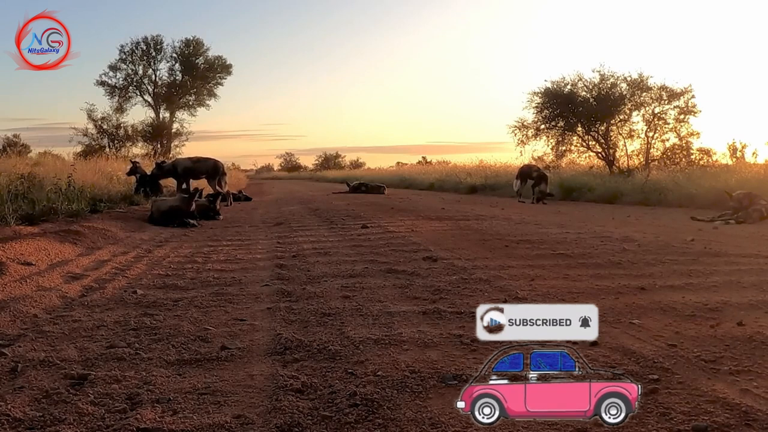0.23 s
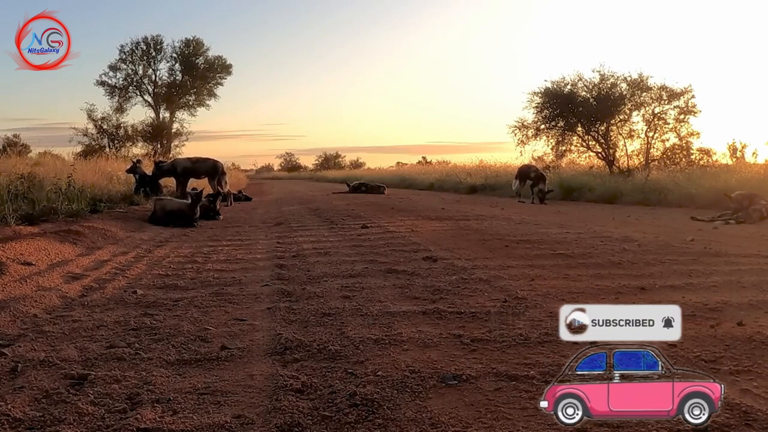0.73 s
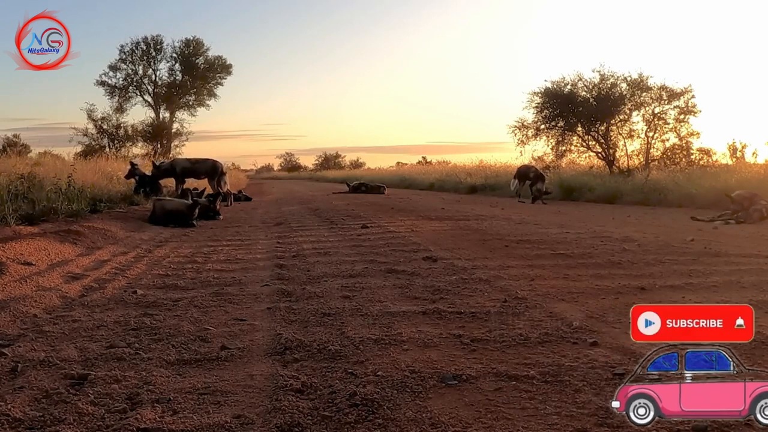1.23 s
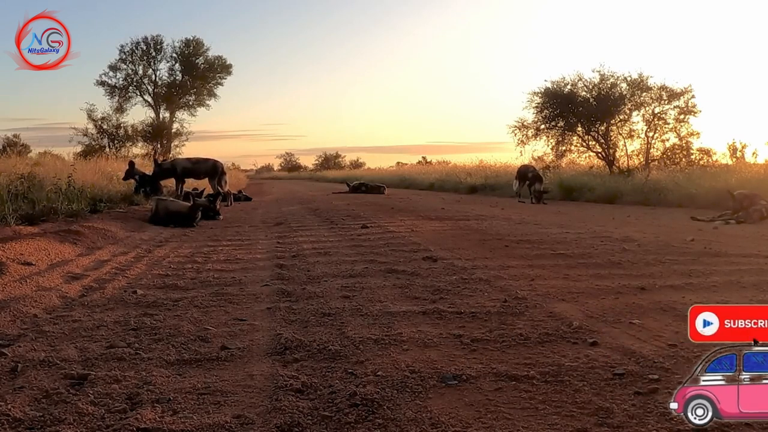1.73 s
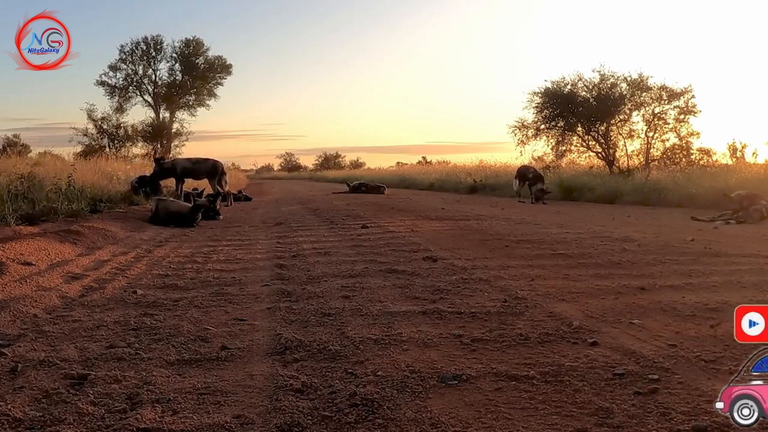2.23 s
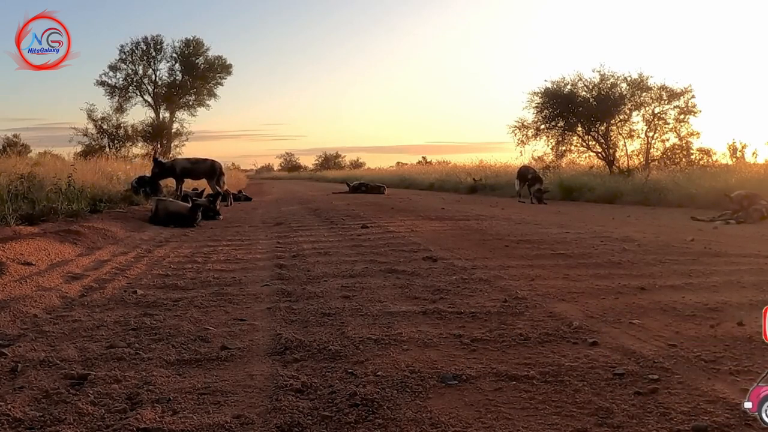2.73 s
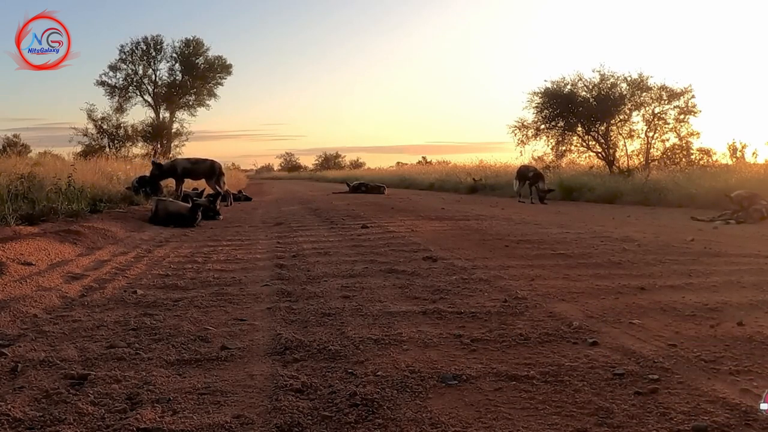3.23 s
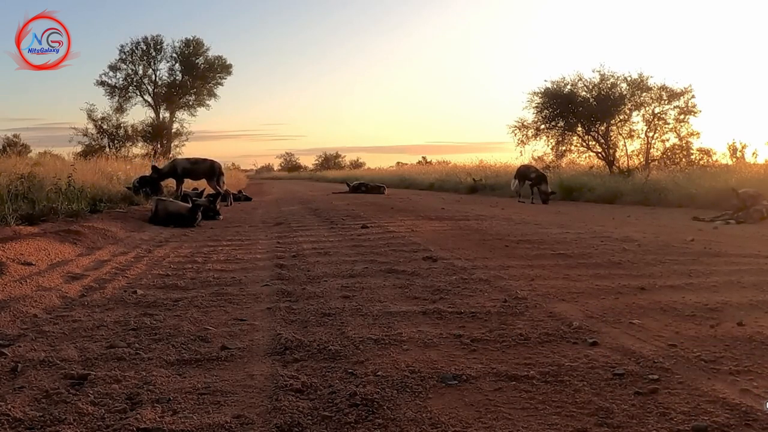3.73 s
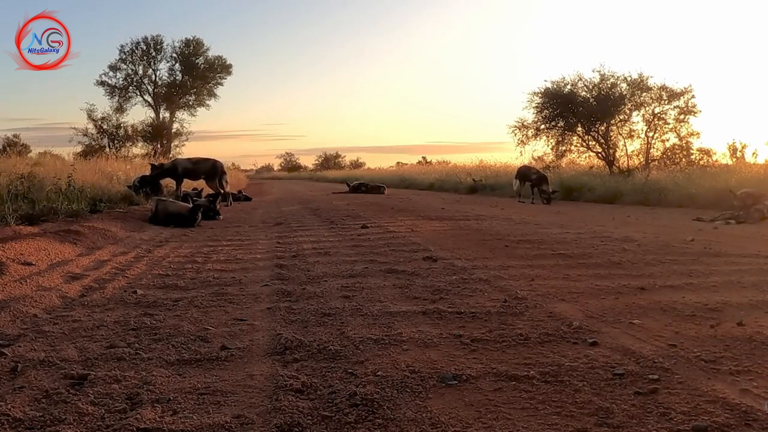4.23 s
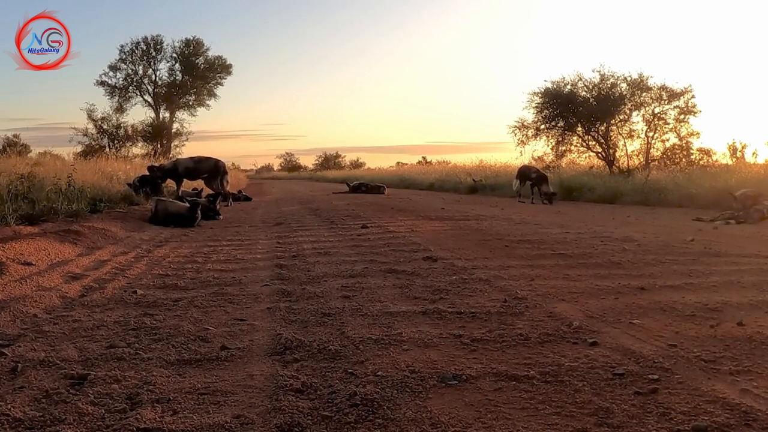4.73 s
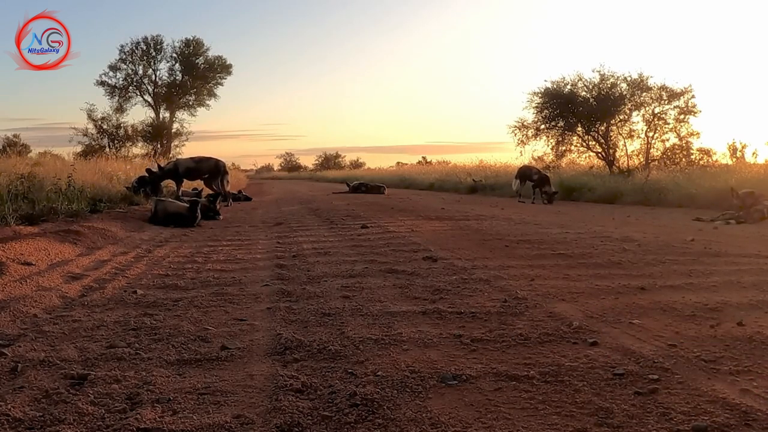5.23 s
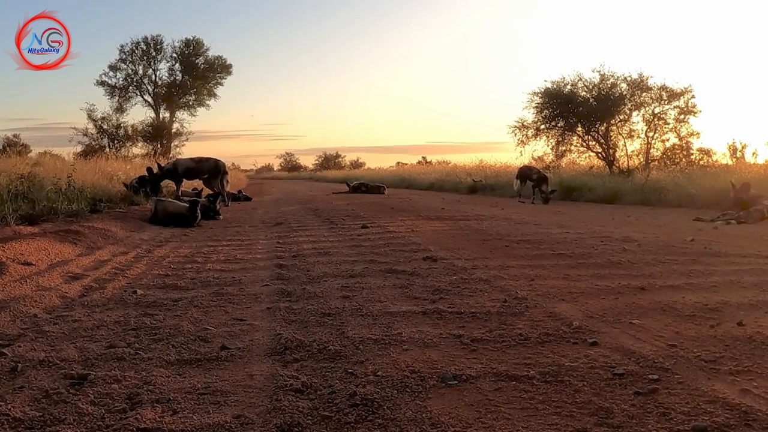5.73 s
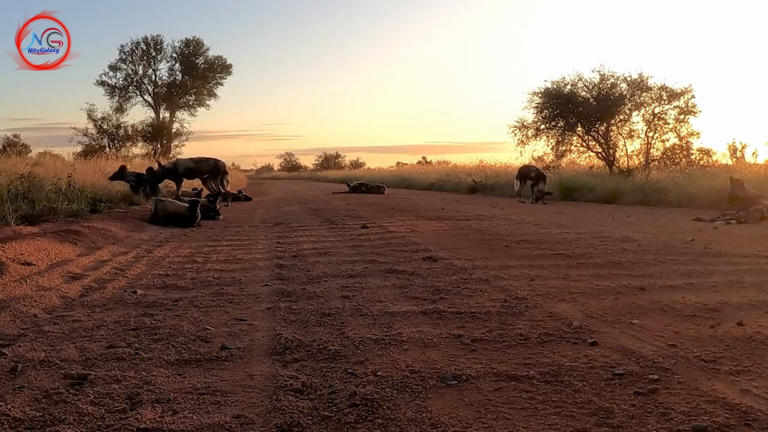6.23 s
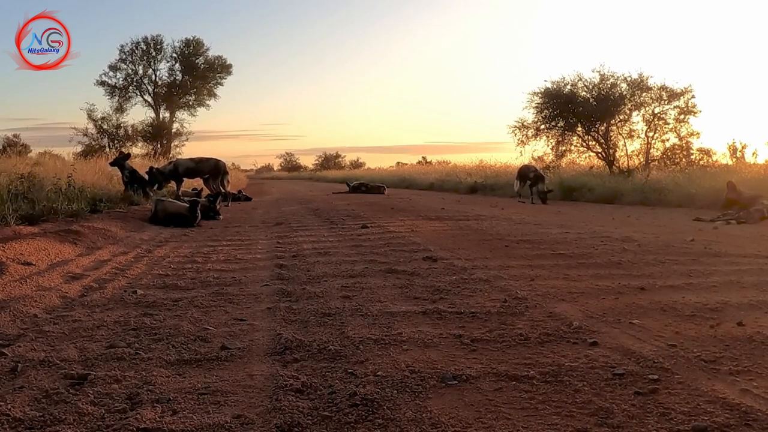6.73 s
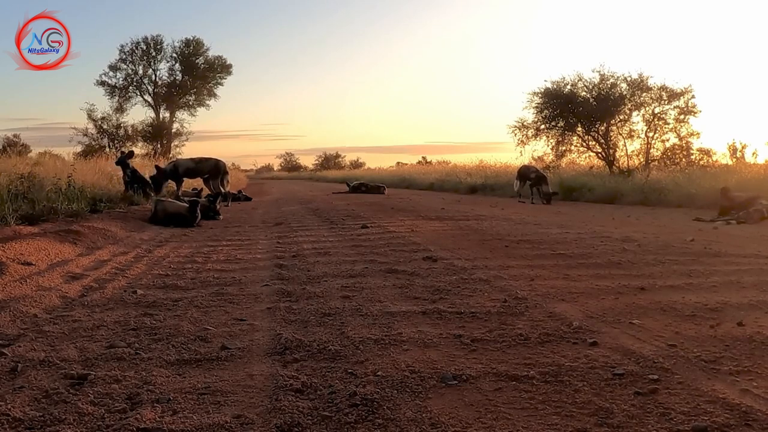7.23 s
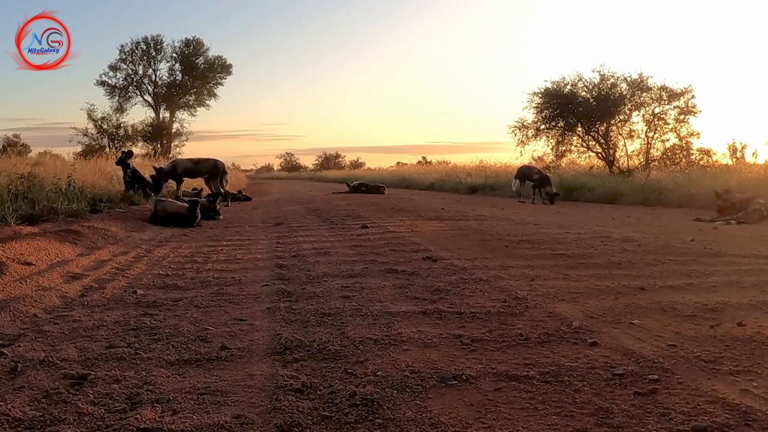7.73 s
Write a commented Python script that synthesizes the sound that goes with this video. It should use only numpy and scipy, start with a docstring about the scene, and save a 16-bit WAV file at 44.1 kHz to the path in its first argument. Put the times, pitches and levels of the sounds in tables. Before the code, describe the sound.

A single clear-voiced bird leads, its rolling notes capped by pure high whistles, returning after a pause of a few seconds. Around it, high crickets pulse in short chirps and faster trills without rest. Small birds tick, rasp and pip, then chatter in rapid groups with very thin gliding calls in the last seconds. A distant faint chorus and airy wash fill the open, nearly dry outdoor space, picked up in mono.

```python
"""Dawn birds and crickets in open bush

A mono microphone in open bush. A songbird repeats a warbled phrase ending in clear whistles: arched and
stepped pitch curves drive unsteady sines. Small birds tick, chatter and give thin, high seeps, built from
quick glides. Crickets chirp and trill near 5 kHz as pulses that fall in pitch. Farther out, scattered notes
and shaped noise make a chorus and its wash. Grass and scattered trees return a faint echo, as sparse taps.
"""
import sys
import numpy as np
from scipy import signal
from scipy.io import wavfile
from scipy.ndimage import uniform_filter1d

SR = 44100
rng = np.random.default_rng(int(sys.argv[2]) if len(sys.argv) > 2 else 0)


def int16_out(signal):
    """Quantize to a 16-bit WAV file."""
    q = np.round(np.clip(np.atleast_2d(signal).T, -1, 1) * 32767)
    wavfile.write(sys.argv[1], SR, q.astype(np.int16))


N = 351036  # samples, just under 8 s

# Colour of the far wash. Each row: frequency in Hz, relative noise density in dB per Hz.
WASH_COLOUR = [(25, -40.5), (250, -46), (400, -40), (650, -27), (880, -14), (1140, -14), (1600, -8),
               (3100, -7), (4900, -4.5), (5750, -18.5), (7900, -20.5), (8500, -26), (12500, -22),
               (13200, -25), (15600, -33)]
# Slurred notes of farther birds. Each row: start in seconds, length in seconds, start pitch in Hz,
# end pitch in Hz, level halfway in dB.
SLUR_NOTES = [(0, .15, 1934, 1920, -60.5), (1.27, 0.053, 3510, 2690, -52), (1.636, .08, 3340, 2620, -56),
              (2.19, 0.15, 2422, 2420, -62), (2.563, 0.17, 2480, 1850, -62),
              (2.674, 0.054, 3550, 3695, -44), (2.736, 0.046, 3310, 2805, -50.5),
              (3.262, .135, 3080, 2220, -56.5), (3.497, .099, 3350, 2260, -54.5),
              (6.073, 0.048, 2384, 2320, -58), (6.379, .13, 3020, 2230, -62),
              (6.538, 0.051, 4000, 3590, -47.5), (6.618, .14, 3040, 2330, -55.5),
              (6.805, 0.048, 3850, 3240, -51), (6.879, .1, 3064, 2160, -60.5),
              (6.739, 0.18, 1960, 1928, -69), (7.123, .055, 3680, 3350, -59),
              (7.55, 0.2, 2130, 2266, -65.5)]
# Cricket chirps in the grass. Each row: start in seconds, typical pulse peak in dB.
CRICKET_CHIRPS = [(.011, -58), (.266, -49.5), (.635, -51), (.917, -54.5), (.992, -49.5), (1.218, -57),
                  (1.389, -50.5), (1.829, -49.5), (2.254, -50), (2.419, -56), (2.602, -48), (2.978, -50.5),
                  (3.396, -48), (3.769, -50.5), (4.143, -51), (4.481, -49.5), (4.876, -51), (5.194, -48.5),
                  (5.596, -49.5), (5.97, -50.5), (6.12, -51), (6.413, -49), (6.694, -48), (6.832, -46.5),
                  (7.181, -49), (7.421, -56), (7.606, -46)]
# Cricket trills. Each row: start in seconds, number of wing strokes, strokes per second,
# mid-stroke pitch the run climbs towards in Hz, level in dB before lift and swell.
CRICKET_TRILLS = [(.012, 12, 44.6, 4400, -56), (.556, 11, 51.3, 4550, -51), (.651, 14, 52.6, 5050, -51),
                  (1.613, 12, 52.6, 4450, -50), (2.003, 12, 46.9, 4550, -58), (2.577, 13, 52.9, 5080, -51),
                  (3.72, 17, 51, 4320, -51), (4.698, 14, 53.5, 5050, -50), (5.372, 9, 51.3, 4820, -54),
                  (5.655, 11, 49, 4460, -52), (6.968, 12, 51.8, 5100, -50), (7.554, 15, 50.8, 4400, -51)]
# Arched notes of the songbird. Each row: start in seconds, length in seconds, pitch at both ends in Hz,
# pitch at the top in Hz, level halfway in dB, swell over the note in dB.
WARBLE_NOTES = [(0.023, 0.091, 2380, 2943, -43.5, 3), (.113, .1, 2302, 2913, -42.5, 2),
                (0.205, 0.086, 2280, 2620, -46, -2), (0.435, 0.084, 2530, 2973, -43.5, -0.5),
                (0.584, 0.094, 2435, 2980, -45, -3.5), (3.744, .096, 2600, 3007, -44.5, 5),
                (3.896, 0.09, 2334, 2900, -42, 0), (3.983, .09, 2280, 2790, -41.5, -0.5),
                (4.066, 0.088, 2270, 2490, -46, -5), (4.283, .091, 2506, 2950, -42, -3.5),
                (4.427, 0.1, 2240, 2904, -42.5, -3.5), (7.671, .082, 2420, 3010, -40, 2),
                (7.808, .103, 2370, 2860, -39.5, 0.5), (7.907, 0.084, 2366, 2776, -39, 3)]
# Runs of upward ticks. Each row: start in seconds, number of ticks (rounded), spacing in seconds,
# tick length in seconds, start pitch in Hz, end pitch in Hz, peak in mid-run in dB,
# first and last tick against the middle in dB.
TICK_SERIES = [(0.3445, 3, .0315, .014, 2000, 7320, -41, -7),
               (1.059, 4.8, .0315, .016, 3000, 9200, -56.5, -3),
               (1.951, 4.3, 0.011, 0.009, 4930, 7650, -48.5, -2),
               (2.269, 4.5, 0.011, 0.0096, 4500, 7830, -47.5, -2),
               (4.499, 4, .0282, .013, 2914, 7550, -44, -6),
               (5.5155, 4.85, .0313, 0.011, 3030, 7050, -39.5, 0),
               (6.257, 3.4, 0.011, 0.0098, 5400, 7360, -47, 0)]
# Clear whistles that end a phrase. Each row: start in seconds, length in seconds, top pitch in Hz,
# level halfway in dB, fade over the note in dB, final sag as a share of the pitch,
# time constant of a scoop from below in seconds (0 = none).
PHRASE_WHISTLES = [(.71, .137, 3323, -33.5, 6, 0.048, 0.028), (.988, .138, 3370, -36, 10, 0.0073, 0),
                   (3.509, 0.14, 3335, -37.5, -3.5, 0.085, 0), (4.527, 0.12, 3304, -32.5, 0, 0, 0.051),
                   (4.783, .142, 3324, -33.5, 5, .015, 0), (7.407, 0.14, 3402, -35.5, 2.5, 0.0043, 0)]
# Slow series of faint rising chips. Each row: start in seconds, number of chips, start pitch in Hz,
# end pitch in Hz, peak in dB.
CHIP_SERIES = [(1.378, 2, 5650, 7500, -64.5), (2.329, 5, 5380, 7600, -59.5), (2.362, 5, 4670, 5810, -56)]
# Scratchy scolding calls. Each row: start in seconds, length in seconds, lowest centre pitch of a flick in Hz,
# highest centre pitch in Hz, typical peak in dB.
SCOLDS = [(1.533, 0.099, 3540, 5070, -54), (2.112, 0.036, 5000, 7280, -50.5),
          (2.966, 0.14, 2890, 4890, -56), (3.76, 0.052, 3130, 4980, -47), (4.511, .1, 3170, 6110, -50.5),
          (4.93, 0.059, 1620, 4275, -53), (5.013, .11, 1594, 6300, -55), (5.517, .15, 1620, 7120, -52),
          (5.817, 0.1, 3380, 5970, -52), (7.6, 0.19, 3140, 4930, -51.5)]
# Groups of contact notes. Each row: start in seconds, number of notes (rounded), spacing in seconds,
# pitch halfway in Hz, rise over a note in Hz, peak of the middle of the group in dB.
PIP_GROUPS = [(1.534, 2.5, .035, 4000, -200, -47.5), (2.329, 1, 0, 3780, 0, -50),
              (2.655, 1, 0, 3250, 600, -53), (2.743, 1, 0, 3930, 400, -46),
              (2.957, 2, .068, 4150, 700, -44.5), (3.099, 1, 0, 4050, -500, -46.5),
              (3.841, 1, 0, 3890, 200, -44), (4.095, 0.92, 0, 3900, -450, -48.5),
              (4.215, 0.98, 0, 3750, 0, -50), (4.515, 3.3, 0.045, 3920, -200, -47),
              (4.886, 3, .0405, 3910, -100, -42.5), (5.158, 0.92, 0, 4330, 1500, -46.5),
              (7.194, 2, .04, 3810, 0, -50.5)]
# Thin high calls. Each row: start in seconds, length in seconds, start pitch in Hz, end pitch in Hz,
# bow above a straight glide in Hz, final level in dB, swell in dB, hoarseness from 0 to 1.
SEEP_CALLS = [(1.705, .22, 5650, 6786, 149, -39.5, 22, 1), (2.029, .18, 5800, 6696, 247.5, -40, 19, 0.7),
              (6.616, 0.074, 4940, 6320, 279, -41, 7, 0), (6.835, 0.019, 7400, 4700, 3, -45, 10, 0),
              (6.86, .14, 6550, 5200, -100, -61.5, 7, 0.05), (6.986, .12, 8170, 6180, 820, -38, 27, 0.08),
              (7.14, .24, 6940, 4860, 99.5, -53, 8.5, 0.07), (7.248, .195, 8250, 6180, 691, -41, 21.5, 0),
              (7.476, .23, 6930, 4580, 0, -51.5, 5, 0.06), (7.794, .17, 7060, 5030, 1, -49, 9.5, 0)]
# Chatter groups. Each row: starts of the four hooked syllables in seconds.
CHATTER_STARTS = [(5.837, 5.868, 5.9, 5.956), (6.1055, 6.141, 6.1823, 6.236),
                  (6.3485, 6.381, 6.429, 6.4763), (6.597, 6.637, 6.675, 6.734),
                  (6.856, 6.8885, 6.928, 6.978)]
# The four syllables of every chatter group. Each row: length in seconds, top pitch in Hz, level halfway in dB.
CHATTER_SYLLABLES = [(0.011, 4630, -40.5), (.016, 4470, -43), (0.023, 4230, -39.5), (.019, 4260, -40)]
# Pitch of a chatter hook. Each row: time after its start in seconds, share of the top pitch.
HOOK_PITCH = [(0, .72), (.003, .92), (.006, 1), (.009, .99), (.015, .94), (.03, .92)]
# Short hoarse squeaks. Each row: start in seconds, level in dB.
SQUEAK_NOTES = [(6.118, -68), (6.248, -59.5), (6.378, -65.5)]


def gain_of(db):
    """Decibels to amplitude."""
    return 10 ** (np.asarray(db) / 20)


def evened(x):
    """Scales to rms 1."""
    return x / np.sqrt(np.mean(x ** 2) + 1e-20)


def add(mix, s, sound):
    """Mixes a sound in at time s, in seconds."""
    part = mix[max(round(s * SR), 0):][:len(sound)]
    part += sound[:len(part)]


def wander(n, per_s):
    """Random drift of about unit size, joining per_s new points a second by straight lines."""
    return np.interp(np.arange(n) * per_s / SR, np.arange(4096), rng.standard_normal(4096))


def progress(length):
    """Runs from 0 to 1 over a sound's length in seconds."""
    return np.linspace(0, 1, max(int(length * SR), 8))


def soft_step(x):
    """Rises smoothly from 0 to 1 as x passes zero."""
    return 1 / (1 + np.exp(-x))


def tone(hz):
    """A sine that follows a pitch curve."""
    return np.sin(2 * np.pi * np.cumsum(hz) / SR)


def sweep(length, start_hz, end_hz, db):
    """A short straight glide that swells to a peak of db and fades."""
    u = progress(length)
    return gain_of(db) * np.sin(np.pi * u) ** 2 * tone(start_hz + (end_hz - start_hz) * u)


def sweeps(rows):
    """Plays rows of short glides, each a start in seconds and the settings of a sweep."""
    out = np.zeros(N)
    for s, *shape in rows:
        add(out, s, sweep(*shape))
    return out


def note(hz, db, waver, flutter_db, rise, fade):
    """A syrinx whistles along a pitch curve, a little unsteady in pitch and level."""
    t = np.arange(len(hz)) / SR
    gate = np.sin(np.pi / 2 * np.minimum(np.minimum(t / rise, t[::-1] / fade), 1))
    level = db + flutter_db * wander(len(t), 130)
    unsteady_hz = hz * (1 + waver * wander(len(t), 540))
    return gate * gain_of(level) * tone(unsteady_hz)


def wash(rms_db=-60.5, patch_db=2.5):
    """The farthest voices blur into a hiss: noise shaped in frequency, with drifting patches."""
    frames, hz = N // 256 + 5, np.fft.rfftfreq(1024, 1 / SR)
    real, imag, patches = rng.standard_normal((3, len(hz), frames))
    patches = uniform_filter1d(patches, size=8, axis=1)  # smooth over time
    patches = evened(uniform_filter1d(patches, size=12, axis=0))  # and over frequency
    points_hz, points_db = np.transpose(WASH_COLOUR)
    colour_db = np.interp(np.log(hz + 1), np.log(points_hz), points_db)
    spectrum = (real + 1j * imag) * gain_of(colour_db[:, None] + patch_db * patches)
    hiss = signal.istft(spectrum, nperseg=1024, noverlap=768)[1][:N]
    return gain_of(rms_db) * evened(hiss)


def slurs(fade_db=4):
    """Farther birds hold a note or glide by an even pitch ratio, fading as they go."""
    out = np.zeros(N)
    for s, length, start_hz, end_hz, db in SLUR_NOTES:
        u = progress(length)
        hz = start_hz * (end_hz / start_hz) ** u
        level = db + fade_db * (.5 - u)
        add(out, s, note(hz, level, waver=.0066, flutter_db=1.5, rise=.012, fade=.011))
    return out


def far_callers(per_s, low_hz, high_hz, length, fall, db, spread_db):
    """Many distant animals give short falling notes at random."""
    out = np.zeros(N)
    for when, pitch, size, loud in rng.random((int(per_s * N / SR), 4)):
        hz = low_hz + (high_hz - low_hz) * pitch
        level = db + spread_db * (2 * loud - 1)
        add(out, when * N / SR, sweep(length * (.5 + size), hz * (1 + fall), hz * (1 - fall), level))
    return out


def treble_flicker():
    """The highest treble flickers faintly, as scattered short glides near 12 kHz."""
    return far_callers(per_s=45, low_hz=11700, high_hz=12900, length=.015, fall=.025, db=-75.5, spread_db=3.5)


def far_crickets(per_s=9, low_hz=4350, high_hz=5000, fall_hz=650, db=-58, spread_db=3):
    """Crickets farther out in the grass give four falling strokes, each chirp at its own pitch and pace."""
    out = np.zeros(N)
    for when, pitch, pace, loud in rng.random((int(per_s * N / SR), 4)):
        hz = low_hz + (high_hz - low_hz) * pitch
        period = .02 + .015 * pace
        stroke = sweep(period, hz + fall_hz / 2, hz - fall_hz / 2, db + spread_db * (2 * loud - 1))
        for k in range(4):
            add(out, when * N / SR + k * period, stroke)
    return out


def chirping_crickets(period=.0345, stroke=.032, start_hz=5280, end_hz=4590, count=3):
    """The wing slows during each stroke over its file, so every pulse falls in pitch."""
    out = np.zeros(N)
    for s, db in CRICKET_CHIRPS:
        for k in range(count):
            add(out, s + k * period, sweep(stroke, start_hz, end_hz, db + rng.normal()))
    return out


def trilling_crickets(stroke=.022, fall_hz=1080, lift_db=2.0, climb_hz=220):
    """Fast runs of falling strokes swell, fade again, and rise in pitch from stroke to stroke."""
    out = np.zeros(N)
    for s, strokes, per_s, last_hz, db in CRICKET_TRILLS:
        for k in range(round(strokes)):
            u = k / strokes
            hz = last_hz - climb_hz * (1 - np.sin(u * np.pi / 2))
            swell_db = np.interp(u, [0, .4, .85, 1], [-4.5, -1.5, -3.0, -7.5]) + rng.normal()
            level = db + lift_db + swell_db
            add(out, s + k / per_s, sweep(stroke, hz + fall_hz / 2, hz - fall_hz / 2, level))
    return out


def far_pulser(db=-65, per_s=15.22):
    """A distant frog keeps up a low pulsing of falling notes that comes and goes."""
    times = np.arange(.022, N / SR, 1 / per_s)
    pulses = sweeps([(s + .003 * rng.normal(), .018, 1760, 1470, db + 2 * rng.normal()) for s in times])
    return pulses * gain_of(1.1 * wander(N, 2.5))


def warbles(rise_s=.022, fade_s=.009, link_s=.005, link_dip_db=3, link_round=2.006):
    """Each note arches up from its foot and back; overlapping notes join, dipping in rounded troughs."""
    out = np.zeros(N)
    for k, (s, length, foot_hz, top_hz, db, swell_db) in enumerate(WARBLE_NOTES):
        tied_in = k > 0 and WARBLE_NOTES[k - 1][0] + WARBLE_NOTES[k - 1][1] > s - link_s
        tied_out = k + 1 < len(WARBLE_NOTES) and WARBLE_NOTES[k + 1][0] < s + length + link_s
        u = progress(length)
        tied = np.where(u < .5, tied_in, tied_out)
        arch = (1 - (2 * u - 1) ** 2) ** np.where(tied, link_round, 1)
        hz = foot_hz + (top_hz - foot_hz) * arch
        level = db + swell_db * (u - .5) - link_dip_db * tied * (1 - arch)
        rise = link_s if tied_in else rise_s
        fade = link_s if tied_out else fade_s
        add(out, s, note(hz, level, waver=.004, flutter_db=1.5, rise=rise, fade=fade))
    return out


def ticks(lead_s=.003, under_ratio=.8, under_db=-9):
    """Even runs of steep upward flicks, each led by a weaker, lower voice."""
    out = np.zeros(N)
    for s, count, spacing, length, start_hz, end_hz, db, ends_db in TICK_SERIES:
        for k, place in enumerate(np.linspace(-1, 1, round(count))):
            level = db + ends_db * place ** 2
            when = s + k * spacing
            add(out, when, sweep(length, start_hz, end_hz, level))
            under = sweep(length, under_ratio * start_hz, under_ratio * end_hz, level + under_db)
            add(out, when - lead_s, under)
    return out


def whistles(sag_s=.009, attack_s=.048, scoop_attack_s=.012, release_s=.011):
    """Loud, pure notes step up or scoop up to a plateau, and sag as the air runs out."""
    climb, climb_at_s, climb_s = .072, .046, .01  # a plain whistle's step: share of pitch, time, quickness
    scoop_hz, scoop_db = 2220, -12.5  # a scoop starts low and soft
    open_hz, open_width_hz = 3048, 29  # and rings out above this pitch
    out = np.zeros(N)
    for s, length, top_hz, db, fade_db, sag, scoop_s in PHRASE_WHISTLES:
        t = progress(length) * length
        level = db + fade_db * (.5 - t / length)
        if scoop_s > 0:
            hz, rise = top_hz + (scoop_hz - top_hz) * np.exp(-t / scoop_s), scoop_attack_s
            level = level + scoop_db * soft_step((open_hz - hz) / open_width_hz)
        else:
            hz, rise = top_hz * (1 - climb * soft_step((climb_at_s - t) / climb_s)), attack_s
        hz = hz * (1 - sag * np.exp((t - length) / sag_s))
        add(out, s, note(hz, level, waver=.0035, flutter_db=1.2, rise=rise, fade=release_s))
    return out


def chips(every_s=.1948, length=.02):
    """Farther birds repeat a rising chip, a short upward glide, at a steady pace."""
    rows = []
    for s, count, start_hz, end_hz, db in CHIP_SERIES:
        for k in range(round(count)):
            rows.append((s + k * every_s, length, start_hz, end_hz, db))
    return sweeps(rows)


def rasps(per_s=260, spread_db=3):
    """A scolding bird breaks its voice into a clump of tiny irregular flicks."""
    out = np.zeros(N)
    for s, span, low_hz, high_hz, db in SCOLDS:
        for t in np.arange(0, span, 1 / per_s):
            pitch, slope, late, loud = rng.uniform(-1, 1, 4)
            hz = (low_hz + high_hz + pitch * (high_hz - low_hz)) / 2
            rise = .13 * (slope + .5)  # more flicks rise than fall
            flick = sweep(.008, hz * (1 - rise), hz * (1 + rise), db + spread_db * loud)
            add(out, s + t + late / per_s, flick)
    return out


def pips(length=.021, waver=.024, step_db=.5):
    """Short, slightly hoarse contact notes, level or sliding, each louder than the last in its group."""
    out, u = np.zeros(N), progress(length)
    for s, count, spacing, pitch_hz, rise_hz, db in PIP_GROUPS:
        for k in range(round(count)):
            hz = (pitch_hz + rise_hz * (u - .5)) * (1 + waver * wander(len(u), 700))
            level = db + step_db * (k - (count - 1) / 2)
            add(out, s + k * spacing, gain_of(level) * np.sin(np.pi * u) * tone(hz))
    return out


def seeps(clean_waver=.0032, hoarse_waver=.0061, rasp=.3, swell_curve=1.25, upper_ratio=1.296, upper_db=-60.5):
    """Thin high glides swell late; at times the other side of the syrinx adds a rough upper voice."""
    out = np.zeros(N)
    for s, length, start_hz, end_hz, bow_hz, db, swell_db, hoarse in SEEP_CALLS:
        u = progress(length)
        hz = start_hz + (end_hz - start_hz) * u + bow_hz * (1 - (2 * u - 1) ** 2)
        level = db - swell_db * (1 - u ** swell_curve)
        grain = 1 + hoarse * rasp * wander(len(u), 1300)
        waver = clean_waver + hoarse * hoarse_waver
        voice = note(hz, level, waver=waver, flutter_db=3.5, rise=.0033, fade=.012)
        upper = note(upper_ratio * hz, upper_db - 5 * (1 - u), waver=.008 + .043 * u,
                     flutter_db=2.5, rise=.008, fade=.008)
        add(out, s, grain * voice)
        add(out, s, hoarse * upper)
    return out


def chatter(flick_db=-6, spike_db=-17):
    """Each syllable is a quick upward flick, shooting into the treble, followed by a louder hook."""
    out = np.zeros(N)
    for group in CHATTER_STARTS:
        for s, (length, top_hz, db) in zip(group, CHATTER_SYLLABLES):
            t = progress(length) * length
            hz = top_hz * np.interp(t, *np.transpose(HOOK_PITCH)) * (1 + .02 * wander(len(t), 650))
            hook_db = db + 2 - 4 * t / length  # the hook fades as it goes
            add(out, s, gain_of(hook_db) * signal.windows.tukey(len(t), .35) * tone(hz))
            add(out, s - .011, sweep(.011, 3400, 5300, db + flick_db + 2 * rng.normal()))
            spike_hz = rng.uniform(6200, 8600)
            add(out, s - .002, sweep(.006, 4600, spike_hz, db + spike_db + 3 * rng.normal()))
    return out


def squeaks(length=.043, pitch_hz=7630):
    """A few very high notes on one pitch, hoarse from a fast pitch waver."""
    out = np.zeros(N)
    for s, db in SQUEAK_NOTES:
        hz = np.full(int(length * SR), pitch_hz)
        add(out, s, note(hz, db, waver=.016, flutter_db=2.0, rise=.01, fade=.011))
    return out


def bush(x, wet_db, t60):
    """Adds sparse, weak echoes from grass and trees, dying by 60 dB in t60 seconds."""
    t = np.arange(SR) / SR
    sparse = rng.random(SR) < 2000 / SR  # about 2000 echoes a second
    taps = rng.standard_normal(SR) * sparse * (t > .004) * gain_of(-60 * t / t60)
    return x + gain_of(wet_db) * signal.fftconvolve(x, taps / np.linalg.norm(taps))[:N]


def scene():
    """Birds, crickets and far chorus each get their own echo; wash and treble flicker get none."""
    songbird = bush(warbles() + whistles(), wet_db=-13.5, t60=.55)
    small_birds = bush(seeps() + squeaks() + chatter() + ticks(), wet_db=-9.5, t60=.084)
    other_birds = bush(pips() + rasps() + slurs() + chips(), wet_db=-9.5, t60=.13)
    crickets = bush(chirping_crickets() + trilling_crickets() + far_crickets(), wet_db=-13, t60=.04)
    far_birds = far_callers(per_s=22, low_hz=1815, high_hz=3913, length=.05, fall=.08, db=-64.5, spread_db=5)
    far_twitter = far_callers(per_s=33, low_hz=2545, high_hz=4360, length=.015, fall=.061, db=-60, spread_db=4.5)
    far_doves = far_callers(per_s=7, low_hz=830, high_hz=966, length=.087, fall=.03, db=-77.5, spread_db=6)
    chorus = bush(far_birds + far_twitter + far_doves + far_pulser(), wet_db=-8, t60=.28)
    return (songbird + small_birds + other_birds + crickets + chorus + wash() + treble_flicker())[None]


def record(dry, low_cut_hz=20, edge_hz=15750):
    """The microphone chain: a low cut against rumble, then a steep upper band limit."""
    low_cut = signal.butter(2, low_cut_hz, "high", fs=SR, output="sos")
    thin = signal.sosfilt(low_cut, dry)
    band_limit = signal.firwin(511, edge_hz, window=("kaiser", 9), fs=SR)
    return signal.oaconvolve(thin, band_limit[None], "same")


dry = scene()
out = record(dry)
int16_out(out)
```